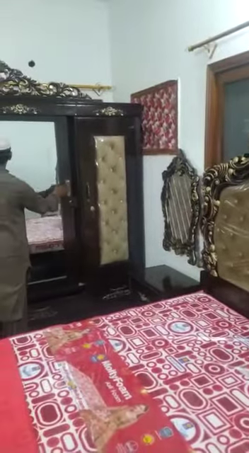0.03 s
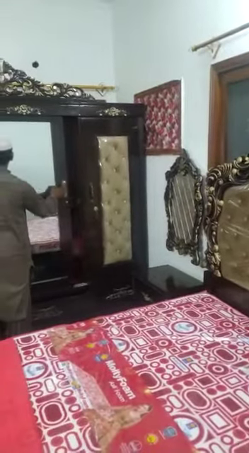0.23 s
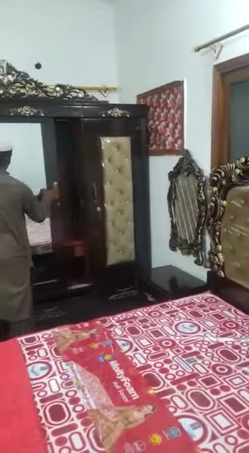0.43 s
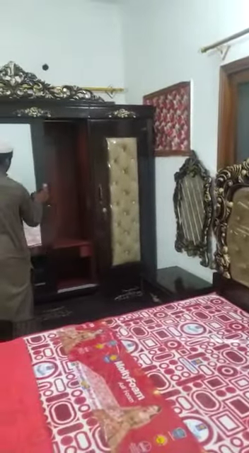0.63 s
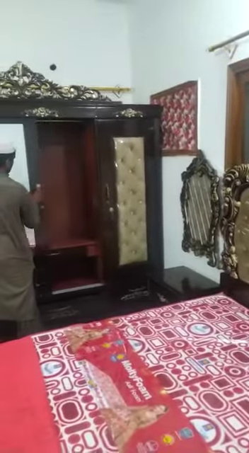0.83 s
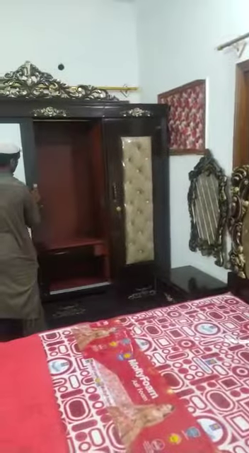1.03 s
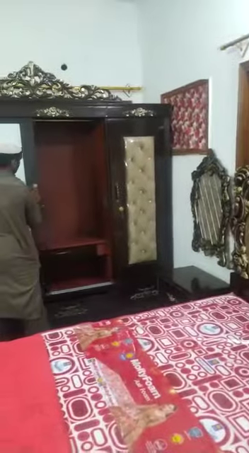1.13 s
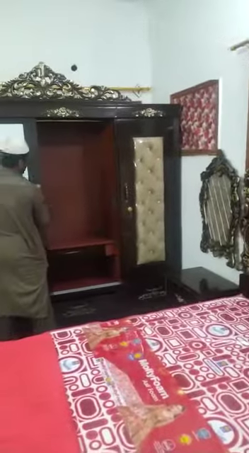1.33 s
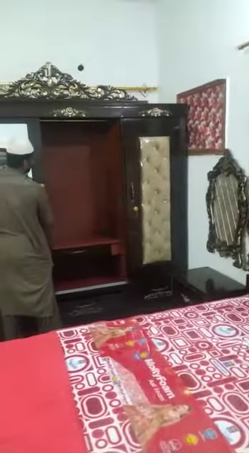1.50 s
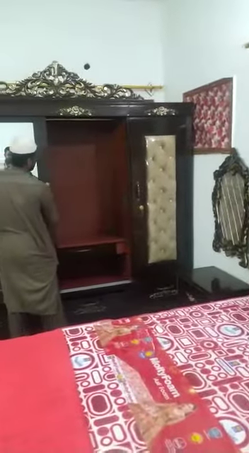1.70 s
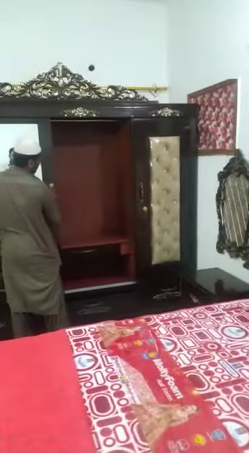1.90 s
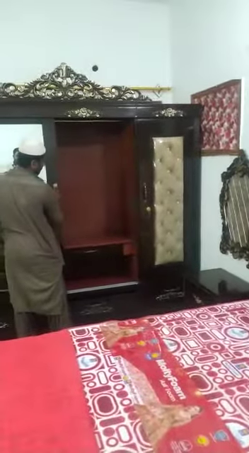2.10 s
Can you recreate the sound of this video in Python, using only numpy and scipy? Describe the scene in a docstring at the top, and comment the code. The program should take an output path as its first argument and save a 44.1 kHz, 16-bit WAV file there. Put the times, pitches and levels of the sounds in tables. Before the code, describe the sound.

A wooden wardrobe door slides open with a rumble, a brief squeal and a soft knock.

```python
"""In a bare-walled bedroom, a wooden wardrobe door is slid open across the room from the listener.
Rolling contact drives the panel into a rumble and grinds grit along the track, while the cabinet booms.
At full speed the panel groans, a roller squeals by friction, and loose fittings clatter and set the
metal track ringing. The door slows and knocks softly on its stop. Clothes rustle over a quiet
background, and reverberation prolongs the sounds on their way to two microphone ports."""
import sys
import numpy as np
from scipy import signal
from scipy.fft import rfft, irfft
from scipy.io import wavfile
from scipy.ndimage import uniform_filter1d

SR = 44100
rng = np.random.default_rng(int(sys.argv[2]) if len(sys.argv) > 2 else 0)


def to_wav(s):
    """Save 16-bit WAV."""
    ch = np.atleast_2d(s).T  # columns
    pcm = np.round(np.clip(ch, -1, 1) * 32767)  # PCM
    wavfile.write(sys.argv[1], SR, pcm.astype(np.int16))


N = 94815
T = np.arange(N) / SR


def amp(db):
    """Amplitude ratio of a level in decibels."""
    return 10 ** (np.asarray(db) / 20)


def unit(x):
    """Normalisation to unit rms."""
    return x / np.sqrt(np.mean(x ** 2) + 1e-20)


def envelope(points):
    """Amplitude envelope, linear in decibels between (t, level) points."""
    return amp(np.interp(T, *np.transpose(points)))


def at_frequency(points, hz):
    """Interpolation along a logarithmic frequency axis."""
    f, value = np.transpose(points)
    return np.interp(np.log(hz + 1), np.log(f + 1), value)


def through(x, response):
    """Convolution with an impulse response scaled to unit energy."""
    return signal.fftconvolve(x, response / np.linalg.norm(response))[:N]


def colour(spectrum, size=4096):
    """Minimum-phase impulse response of a magnitude spectrum."""
    hz = abs(np.fft.fftfreq(size, 1 / SR))
    log_gain = np.log(amp(at_frequency(spectrum, hz)))
    return np.fft.ifft(np.exp(np.conj(signal.hilbert(log_gain)))).real


def ring(modes):
    """Modal superposition: damped sinusoids, each with an energy set by its level."""
    t = T[:SR // 2]
    return sum(amp(db) / np.sqrt(t60) * 1000 ** (-t / t60) * np.sin(2 * np.pi * hz * t)
               for hz, db, t60 in modes)


def clicks(per_s, spread_db):
    """Shot noise: tiny independent contacts of uneven size."""
    size = amp(spread_db * np.minimum(rng.exponential(1, N), 4))
    sign = rng.choice([-1., 1.], N)
    return unit(size * sign * (rng.random(N) < per_s / SR))


def blow(start_s, decay_s):
    """Contact chatter: an exponentially decaying burst of bounces, of unit energy."""
    age = T - start_s
    burst = clicks(per_s=3500, spread_db=0.5) * (age >= 0) * np.exp(-abs(age) / decay_s)
    return burst / (np.linalg.norm(burst) + 1e-12)


def impacts(blows, decay_s=0.0077):
    """Superposition of blows into one driving force."""
    return sum(amp(db) * blow(start_s, decay_s) for start_s, db in blows)


def steady(x, window_s=0.09):
    """Division by the running rms evens out slow swells and keeps the fine grain."""
    power = uniform_filter1d(np.mean(np.atleast_2d(x) ** 2, 0), round(window_s * SR))
    return x / np.sqrt(abs(power) + 1e-20)


def wander(cutoff_hz):
    """Slow random fluctuation: low-passed noise."""
    lowpass = signal.butter(2, cutoff_hz, fs=SR, output="sos")
    return unit(signal.sosfilt(lowpass, rng.standard_normal(N)))


def rough_tone(hz, depth, flutter_hz):
    """Random modulation of amplitude and phase roughens a tone."""
    phase = 2 * np.pi * np.cumsum(hz * np.ones(N)) / SR
    modulation = 1 + depth * (wander(flutter_hz) + 1j * wander(flutter_hz))
    return unit((modulation * np.exp(1j * phase)).real)


# Spectrum of the background: f/Hz, level/dB
AIR_SPECTRUM = [(20, 13.5), (70, -13), (170, 3.5), (300, 9), (450, -3.5), (850, -6.5), (2300, -17.5),
                (3200, -11), (4000, -13.5), (9000, -15), (12000, -37), (15500, -40)]
def air():
    """Stationary coloured noise forms a quiet background."""
    return amp(-50) * through(rng.standard_normal(N), colour(AIR_SPECTRUM))


# Push on the door: t/s, rumble level/dB, grinding level/dB
DOOR_PUSH = [(0, -42.5, -39), (.17, -39.5, -53), (.32, -35.5, -41), (.5, -32.5, -34.5), (.66, -28, -33),
             (.8, -31.5, -32.5), (.95, -28, -34.5), (1.08, -29, -35), (1.3, -34.5, -44), (1.42, -40, -49),
             (1.56, -45.5, -67)]
def push(t, stop_s=1.594, decay_db_per_s=98):
    """Rumble and grinding amplitudes follow the push, then decay exponentially once the door rests."""
    times, *levels = np.transpose(DOOR_PUSH)
    decay_db = decay_db_per_s * np.maximum(t - stop_s, 0)
    return [amp(np.interp(t, times, db) - decay_db) for db in levels]


# Broadband response of the door panel: f/Hz, level/dB
PANEL_SPECTRUM = [(20, -35), (70, -23), (110, -9), (170, 0.5), (250, -1), (360, -10.5), (450, -18),
                  (750, -17.5), (2000, -72), (16000, -104)]
# Modes of the panel: f/Hz, level/dB, T60/s
PANEL_MODES = [(173.3, 2.5, 0.13), (234, -6, 0.2), (273, -0.5, 0.14), (340, -9.5, 0.065), (561, -13, .12),
               (827, -11.5, .12)]
def panel_rumble():
    """Forced vibration: bumps in the track shake the panel, whose sound in the room follows the push."""
    bumps = clicks(per_s=320, spread_db=0.7)
    panel = through(bumps, colour(PANEL_SPECTRUM)) + amp(1) * through(bumps, ring(PANEL_MODES))
    rumble_gain, _ = push(T)
    return amp(-3) * steady(bedroom(panel)) * rumble_gain


# Spectrum of the grinding: f/Hz, level/dB
GRIT_SPECTRUM = [(20, -55), (250, 5.5), (500, -2.5), (650, -0.5), (820, 1), (1200, -0.5), (1800, -4.5),
                 (2600, -9.5), (3200, -14.5), (6000, -22.5), (9500, -22), (12000, -32), (16000, -44)]
def roller_grit(lead_s=0.048):
    """Rolling noise: fine grit under the wheels makes a dense train of contacts."""
    _, grind_gain = push(T + lead_s)  # early, as the reverberation takes time to build
    grit = clicks(per_s=2500, spread_db=3.5) * grind_gain
    return amp(1.5) * through(grit, colour(GRIT_SPECTRUM))


# Response of the cabinet: f/Hz, level/dB
BOOM_SPECTRUM = [(3, -58), (20, -14), (30, -8), (43, 11.5), (55, -4), (75, -21), (95, 15), (125, -2),
                 (250, -37), (16000, -80)]
# Swell of its boom: t/s, level/dB
BOOM_LEVELS = [(0, 1), (.6, 1), (.75, 1), (1.05, -4), (1.3, 3), (1.5, 0), (1.6, -5), (2.15, -35)]
def cabinet_boom():
    """Low resonances of the carcass boom faintly while the door moves, then fade."""
    boom = through(rng.standard_normal(N), colour(BOOM_SPECTRUM))
    return amp(-53.5) * steady(boom) * envelope(BOOM_LEVELS)


# Envelope of the rustle: t/s, level/dB
RUSTLE_LEVELS = [(0, -43.5), (.14, -45), (.25, -34.5), (.34, -36), (.45, -43.5), (.65, -40.5), (.95, -54.5),
                 (1.14, -46), (1.28, -52.5), (1.42, -48.5), (1.48, -47), (1.62, -49), (1.73, -52.5),
                 (1.84, -46), (1.9, -49.5), (1.98, -44), (2.15, -52)]
# Spectrum of rubbing fabric: f/Hz, level/dB
FABRIC_SPECTRUM = [(20, -50), (300, -2.5), (1000, -3), (2300, -1), (3200, -7.5), (4200, -3.5), (5000, -5.5),
                   (6500, -.5), (8600, 1), (10300, -5), (12000, -11), (14500, -19), (16000, -44)]
def clothes_rustle():
    """Friction noise: fabric rubs in fine bright grains as the body moves."""
    grains = clicks(per_s=4600, spread_db=3.5) * envelope(RUSTLE_LEVELS)
    return through(grains, colour(FABRIC_SPECTRUM))


# Judder of the panel at full speed: t/s, f/Hz, level/dB
GROAN_GLIDE = [(.56, 270, -50), (.66, 270, -36), (.71, 258, -36), (.755, 246, -29.5), (.79, 230, -33),
               (.82, 222, -32.5), (.85, 220, -55)]
def panel_groan():
    """A modulated oscillation of falling frequency: the panel judders."""
    times, hz, db = np.transpose(GROAN_GLIDE)
    tone = rough_tone(np.interp(T, times, hz), depth=0.16, flutter_hz=40)
    return tone * amp(np.interp(T, times, db)) * (T > times[0]) * (T < times[-1])


# Envelopes of the squeal: t/s, lower tone level/dB, upper tone level/dB
SQUEAL_LEVELS = [(.69, -48, -55), (.702, -30, -35), (.745, -28.5, -33.5), (.777, -33.5, -28),
                 (.797, -30, -30), (.815, -40, -35), (.845, -44, -37), (.9, -54, -52)]
def roller_squeal(tones_hz=(1346, 1529)):
    """Friction-induced vibration: a roller scrapes the track; the lower tone leads, then the upper."""
    times, *levels = np.transpose(SQUEAL_LEVELS)
    tones = sum(rough_tone(hz, depth=0.58, flutter_hz=65) * amp(np.interp(T, times, db))
                for hz, db in zip(tones_hz, levels))
    return tones * (T > times[0]) * (T < times[-1])


# Blows of the loose fittings: t/s, level/dB
FITTING_BLOWS = [(0.691, -7), (0.701, -2.5), (0.717, -5), (0.734, -2), (.748, -4.5), (0.758, -5),
                 (.775, -4), (0.78, -7.5), (.790, -6.5), (.812, -10), (0.836, -9), (1.056, -19.5),
                 (1.078, -19.5)]
# Spectrum of a clack: f/Hz, level/dB
CLACK_SPECTRUM = [(20, -31), (150, -1), (250, -5), (450, 2), (1000, 1), (1500, 0), (2200, 1), (2750, 2),
                  (3050, -2), (3600, 0.5), (4300, 1), (4950, -3), (5600, 1.5), (9000, -0.5), (11000, -11),
                  (13000, -14.5), (16000, -25)]
def fittings_clatter():
    """Impact noise: brief contacts of the loose fittings radiate broadband clacks."""
    return amp(6) * through(impacts(FITTING_BLOWS), colour(CLACK_SPECTRUM))


# Modes of the metal track: f/Hz, level/dB, T60/s
TRACK_MODES = [(1093, -4, .1), (1281, -3, .06), (1440, -4, .03), (1695, -3, .08), (2302, -7, .08),
               (3989, -8, .07), (4143, -2, .07), (4340, -2, .06), (4720, -7, .07), (5453, -6, .05),
               (6282, -8, .04), (6595, -8, .04)]
def track_ring():
    """Free vibration: the track rings in its modes after each blow of the fittings."""
    return amp(-3.5) * through(impacts(FITTING_BLOWS), ring(TRACK_MODES))


# Blows of the door on its stop: t/s, level/dB
STOP_BLOWS = [(1.44, -2.5), (1.455, -4.5), (1.468, -3.5), (1.488, -9.5), (1.516, -18)]
# Spectrum of the wooden thud: f/Hz, level/dB
THUD_SPECTRUM = [(20, -42), (120, -13), (280, -8), (500, 2), (850, -1.5), (1250, -5.5), (1700, -12),
                 (3000, -24), (9000, -25), (16000, -50)]
def stop_knock():
    """Damped impact: the wood meets its stop in a few dull, weakening knocks."""
    return amp(-4.5) * through(impacts(STOP_BLOWS, decay_s=0.014), colour(THUD_SPECTRUM))


# Reverberation time of the bedroom: f/Hz, T60/s
ROOM_T60 = [(60, 0.062), (250, 0.52), (1000, 0.87), (4000, 0.6), (8000, 0.6), (16000, 0.42)]
PORT_GAP_M, PORT_LAG_S, SOUND_M_PER_S = 0.17, 0.0002, 343
def room_response(direct_db=-9, early_db=1.5, early_s=0.0067):
    """Direct sound, early reflections and a diffuse field, coherent at the two ports only in the bass."""
    hz, t, (left, independent) = signal.stft(rng.standard_normal((2, SR)), SR, nperseg=512)
    coherence = np.sinc(2 * hz * PORT_GAP_M / SOUND_M_PER_S)[:, None]
    right = coherence * left + np.sqrt(1 - coherence ** 2) * independent
    tail = 1000 ** (-t / at_frequency(ROOM_T60, hz)[:, None])
    early = amp(early_db) * np.exp(-t / early_s)
    response = signal.istft(np.array([left, right]) * (tail + early), SR, nperseg=512)[1]
    response /= np.linalg.norm(response[0])
    response[[0, 1], [round(PORT_LAG_S * SR), 0]] += amp(direct_db)
    return response


def bedroom(x, patterns=6, cycles_per_s=4):
    """Reflections vary as a source moves: equal-power crossfades cycle through room responses."""
    heard = np.zeros((2, N))
    for k in range(patterns):
        offset = (T * cycles_per_s * patterns - k) % patterns - patterns / 2
        share = np.cos(np.pi / 2 * np.minimum(abs(offset), 1))
        heard += [through(x * share, port) for port in room_response()]
    return heard


def direct(x):
    """Path difference: the direct wave reaches the left port slightly later."""
    return np.array([np.interp(T - PORT_LAG_S, T, x), x])


def scene():
    """Superposition: sources at the front arrive mostly by the direct path, the boom wholly so."""
    front = track_ring() + roller_squeal() + panel_groan()
    rest = roller_grit() + fittings_clatter() + stop_knock() + clothes_rustle() + air()
    reverberant = panel_rumble() + bedroom(rest + amp(-10) * front)
    return reverberant + direct(amp(-1.5) * front + cabinet_boom())


# Difference in colour between the ports: f/Hz, left minus right level/dB
PORT_BALANCE = [(60, 1), (180, -0.2), (350, 2.5), (550, -1), (800, 2.5), (1400, 4.5), (2800, 1),
                (4300, 4.5), (6500, 4), (8000, 0), (9000, -4.5), (9900, -10), (11200, -2), (13000, 0.5)]
def record(dry, cutoff_hz=15550):
    """Linear filtering: each port has its own frequency response, and a low-pass limits the band."""
    balance_db = at_frequency(PORT_BALANCE, np.fft.rfftfreq(2 * N, 1 / SR))
    port_gains = amp([balance_db / 2, -balance_db / 2])
    heard = irfft(rfft(dry, 2 * N) * port_gains)[:, :N]
    lowpass = signal.firwin(511, cutoff_hz, window=("kaiser", 9), fs=SR)
    return signal.oaconvolve(heard, lowpass[None], "same")


dry = scene()
out = record(dry)
to_wav(out)
```